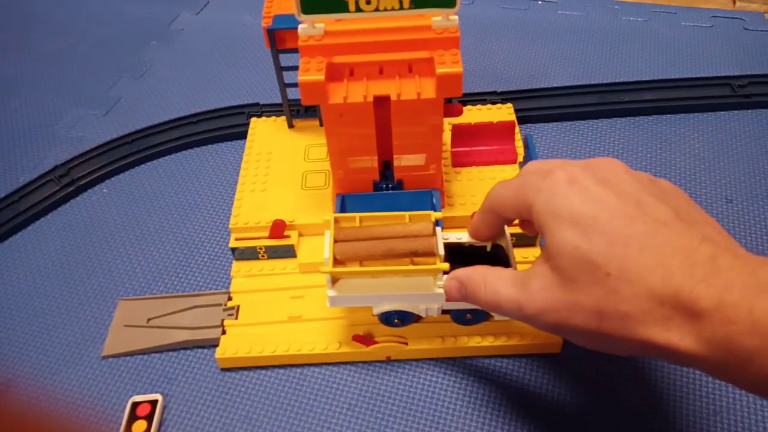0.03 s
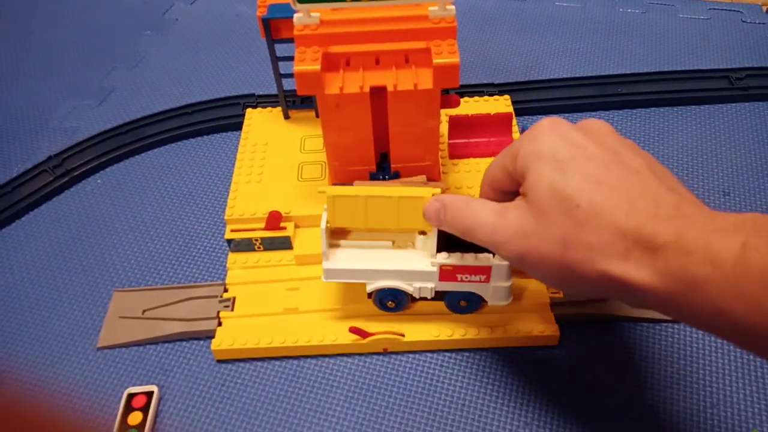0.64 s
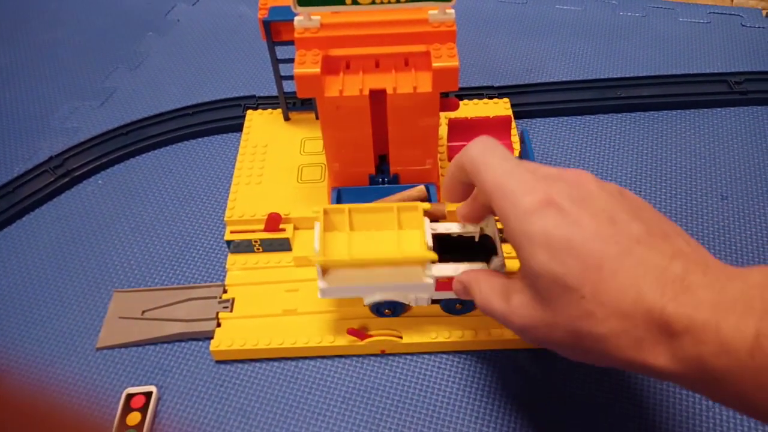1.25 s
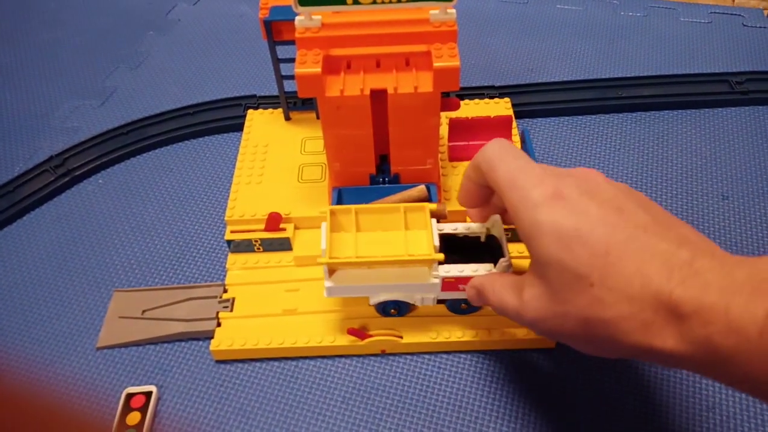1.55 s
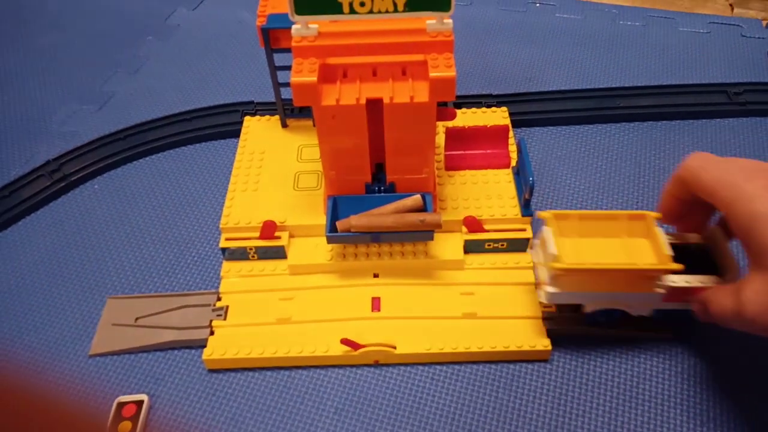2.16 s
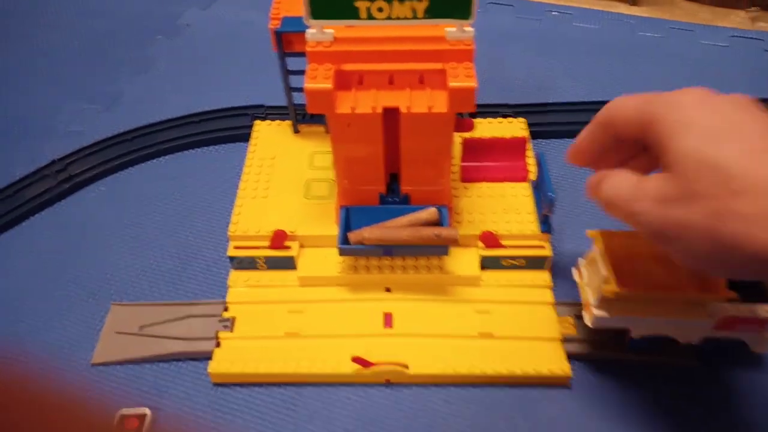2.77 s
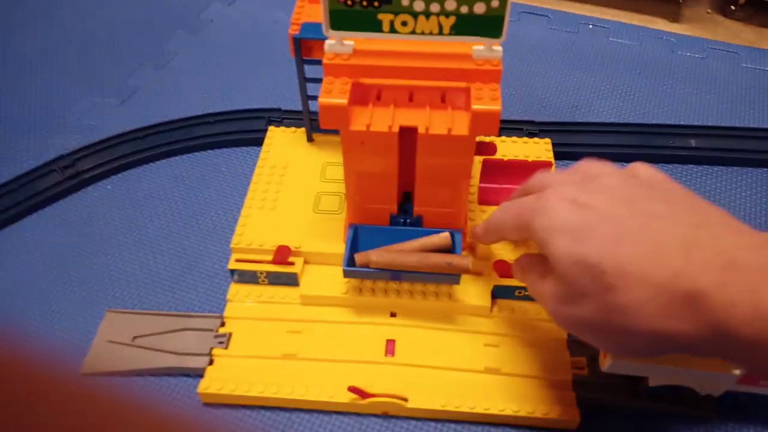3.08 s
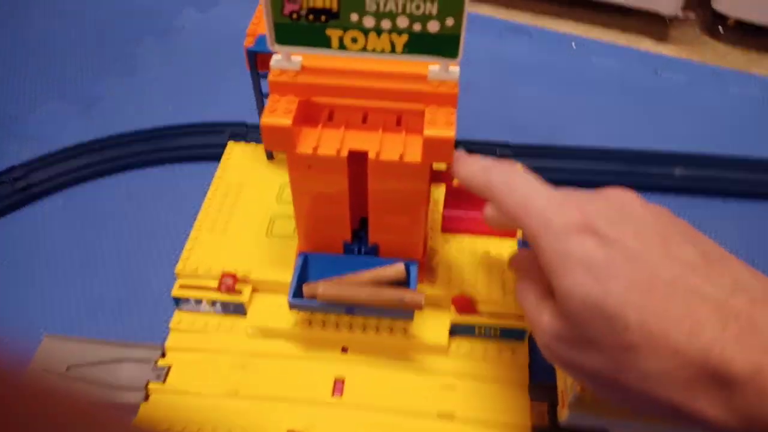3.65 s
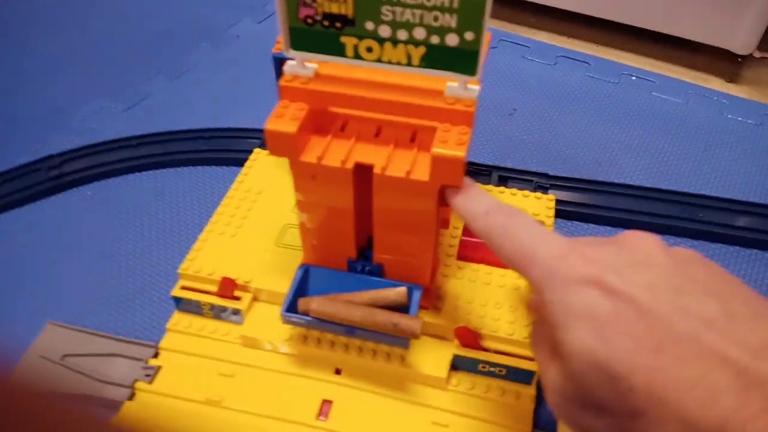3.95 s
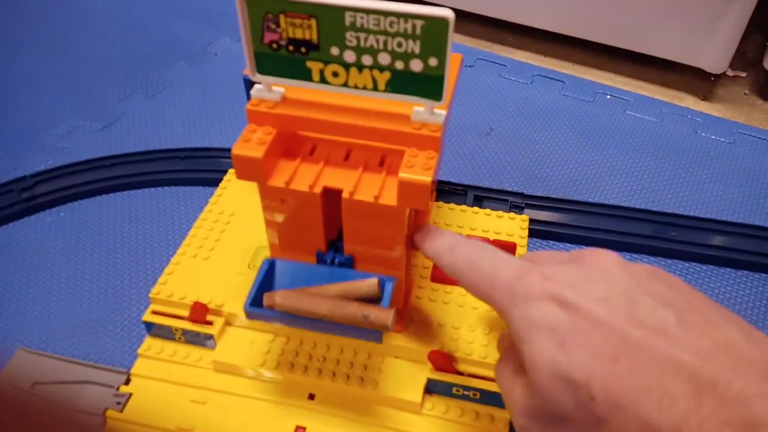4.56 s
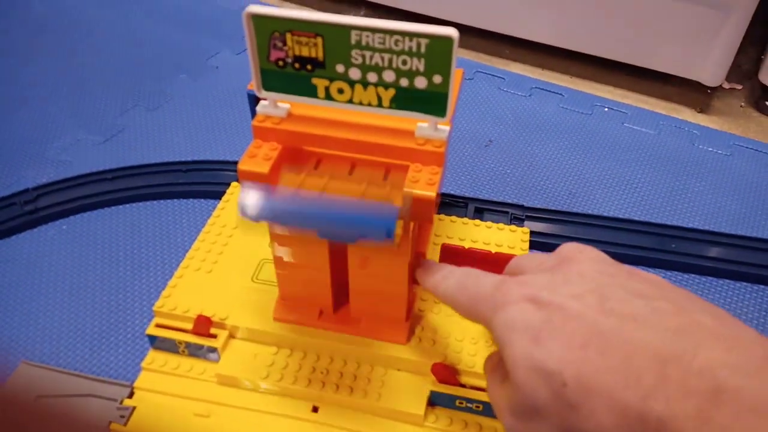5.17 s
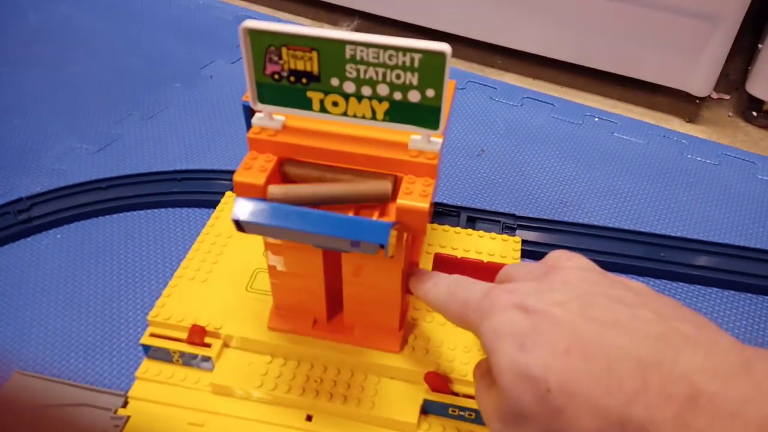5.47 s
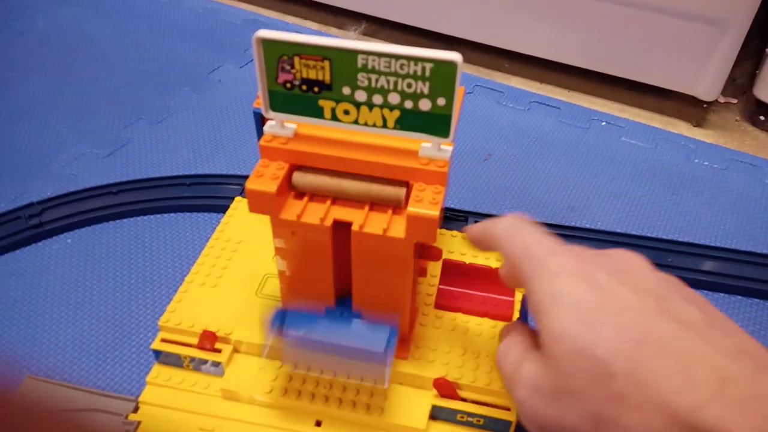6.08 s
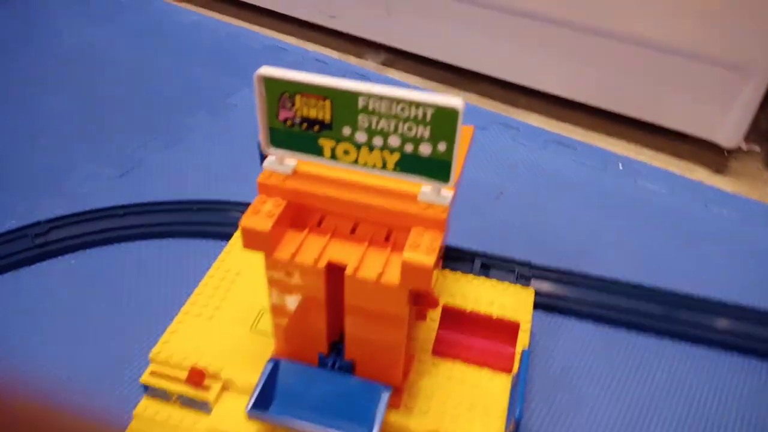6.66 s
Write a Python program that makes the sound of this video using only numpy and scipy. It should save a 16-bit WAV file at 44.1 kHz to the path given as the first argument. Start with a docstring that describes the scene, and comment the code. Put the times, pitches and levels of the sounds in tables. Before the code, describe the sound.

Plastic toy logs are tipped, lifted and rolled with sharp hollow clacks, over the faint whirr of a battery toy motor.

```python
"""A battery toy motor whirrs and ticks as it travels about: its gears hiss, catch and shake the casing.
In front of it, a little truck tips plastic logs into a tray; a hand-worked lift hoists them and they
tumble and roll down its tower. Each knock is a short crack that rings the hollow plastic playset;
each slide is a stream of tiny collisions. The room is small; the hand on the camera bumps softly."""
import sys
import numpy as np
from scipy import signal
from scipy.fft import rfft, irfft, next_fast_len
from scipy.io import wavfile
from scipy.ndimage import uniform_filter1d, map_coordinates

SR = 44100
rng = np.random.default_rng(int(sys.argv[2]) if len(sys.argv) > 2 else 0)


def wav_out(sig):
    """Save sig, one row per channel (or a flat mono array), as 16-bit PCM at SR to the path in sys.argv[1]."""
    wavfile.write(sys.argv[1], SR, np.round(np.clip(np.atleast_2d(sig).T, -1, 1) * 32767).astype(np.int16))


N = 300762
TIME = np.arange(N) / SR

# motor on its travels (time [s], hiss [dB], casing [dB], ticks re hiss [dB], hiss treble [dB])
MOTOR_LEVELS = [(0, -51, -60.5, -0.5, -0.5), (.4, -50.5, -56.5, 1.5, 2), (1.1, -48, -54, -6, -3),
                (1.6, -51, -56.5, -11, 1.5), (2, -53, -58.5, -4, 4), (2.7, -55.5, -59, 9, 5.5),
                (3.3, -52, -60.5, -5, 1), (3.8, -51.5, -62, -10.5, -3), (4.7, -53.5, -64, -6.5, -1),
                (6.82, -52.5, -59.5, 0.5, -2.5)]
# gear hiss (frequency [Hz], level [dB])
HISS_SPECTRUM = [(4000, -28.5), (5000, -2), (5500, 4.5), (6100, 6), (7000, 3), (7600, -5.5), (8200, -17.5),
                 (9400, -20.5), (11000, -28), (13300, -36.5), (15200, -17.5), (16000, -30.5)]
# casing resonances before the bend (frequency [Hz], width [Hz], level [dB])
CASING_MODES = [(1390, 270, -10.5), (2010, 80, -4.5), (2440, 530, 1), (2904, 200, 1.5), (3340, 450, 2.5),
                (3620, 160, -3), (4130, 610, 3)]
# resonances sink as the toy moves off, climb as it comes round (time [s], pitch [ratio])
TRAVEL_BEND = [(0, 0.99), (.5, 1.015), (1.2, 1.064), (2.3, 0.93), (3.0, 1.03), (3.6, 1.015), (4.3, 0.96),
               (6.82, 0.92)]
# gear catch on five successive turns (level [dB])
CATCH_PATTERN_DB = [5, 1.5, -5, 4, -21]
# hardest gear catches (time [s], relative level [dB])
GEAR_SNAGS = [(.053, -46), (.117, -41), (.158, -45), (.266, -41), (.33, -42), (.393, -43), (.435, -32),
              (.893, -45), (.957, -37), (.998, -37), (1.063, -42), (4.015, -43)]
# casing and creaking plastic (middle [s], length [s], frequency [Hz], level [dB], glide [% per length])
NARROW_RINGS = [(0.072, 0.26, 1630, -66.5, -3), (0.136, 0.18, 4250, -62.5, 0),
                (0.104, 0.22, 5190, -61.5, -1), (0.298, 0.4, 2805, -63.5, -2),
                (0.326, 0.12, 3650, -62.5, -5), (.43, 0.17, 1570, -65, -3.5), (0.46, 0.12, 5060, -61, -4),
                (0.507, 0.13, 3460, -53, -3), (0.798, 0.21, 3366, -54.5, 0.5), (0.853, 0.18, 4230, -59, 2),
                (0.942, 0.15, 3510, -57, -1), (1.087, 0.27, 3360, -59, 0), (1.5, .26, 3420, -61.5, -2),
                (1.581, 0.22, 1904, -64.5, 0), (1.923, 0.11, 1186, -54, -4), (2.251, 0.39, 1905, -66.5, -1),
                (2.242, 0.17, 3640, -62, 1.5), (2.58, 0.24, 3685, -66, 0), (3.267, .5, 2890, -62.5, 2.5),
                (3.325, 0.25, 4200, -64.5, 3), (3.352, 0.5, 1982, -66.5, 2.5),
                (3.953, 0.24, 2980, -73, -1.5), (4.655, 0.093, 1360, -64, -13), (6.755, 0.07, 2843, -52, 0),
                (6.766, 0.074, 4250, -59, -3)]
# still room (frequency [Hz], level [dB])
AIR_SPECTRUM = [(20, -29), (45, -6), (90, 0.5), (220, -6.5), (400, -7.5), (1000, -9), (3000, -17.5),
                (8000, -53)]
# blows: logs tip 0.5 s, lift climbs 4.3 s, tumble 5.3 s, lift drops 6.0 s, logs roll down 6.3 s
# (time [s], part, level [dB], hardness tilt [dB/octave], piece ring [Hz])
BLOWS = [ (.498, "log", -44.5, 0, 2190), (0.548, "log", -37, -4, 2940), (0.6008, "truck", -39, 1, 2720),
         (.616, "log", -34, 1, 4580), (.633, "log", -36.5, -3.5, 2140), (0.645, "log", -39, 5, 4420),
         (.665, "catch", -35.5, -3, 4610), (.677, "log", -36, 4.5, 2640), (.684, "log", -34, 1, 2000),
         (0.7003, "log", -43.5, 4, 2870), (.787, "log", -41, 0, 4770), (1.113, "log", -44.5, -1, 1910),
         (1.1747, "truck", -35.5, 3, 5550), (1.227, "truck", -38.5, -1, 2920),
         (1.233, "truck", -43.5, -1, 2370), (1.347, "tower", -41.5, -3, 1690),
         (1.3519, "lift", -30.5, 2, 1130), (1.36, "log", -37.5, 6, 2300), (1.3705, "truck", -42, 3, 3400),
         (1.38, "log", -46, 2, 3440), (1.418, "log", -38.5, -1.5, 2236), (1.444, "log", -45.5, 0, 2250),
         (1.647, "log", -54, 2, 2005), (1.693, "base", -53.5, 2.5, 1126), (1.843, "log", -55.5, -2.5, 1936),
         (1.879, "log", -51.5, 5, 2100), (1.962, "lift", -61.5, -4, 1200),
         (1.974, "lift", -58.5, -1.5, 1500), (2.139, "truck", -55, -0.5, 3020),
         (2.209, "log", -55.5, 1, 1955), (2.232, "log", -57, 1, 1920), (2.403, "log", -58, -0.5, 3230),
         (2.812, "log", -61, 6, 1897), (3.233, "tower", -57.5, 5.5, 5250), (3.704, "log", -59, 1, 2430),
         (4.297, "base", -54.5, 1.5, 1296), (4.323, "log", -52, -1, 2630), (4.432, "lever", -65, -0.5, 370),
         (4.453, "log", -59, 1, 1730), (4.546, "base", -57.5, 0.5, 1084), (4.618, "log", -55.5, -1.5, 1440),
         (4.812, "base", -62.5, 4, 1150), (4.833, "lift", -57, -3.5, 1290), (4.912, "lever", -42, -1, 400),
         (4.99, "lever", -63.5, -0.5, 2260), (5.057, "lever", -53.5, 0, 2305),
         (5.1604, "lift", -39, 0, 2400), (5.172, "lift", -46.5, 0, 2530), (5.182, "lift", -45.5, 0, 1450),
         (5.24, "base", -57, -0.5, 1080), (5.27, "tower", -47, 2, 1100),
         (5.275, "end stop", -33, -0.5, 1090), (5.3496, "tower", -40, -2, 4580),
         (5.358, "truck", -32.5, -0.5, 1715), (5.362, "log", -38.5, -6, 1780),
         (5.3838, "tower", -34, -1, 4680), (5.387, "tower", -43.5, -4, 2600),
         (5.3972, "tower", -34, 0, 4120), (5.409, "tower", -35.5, 1, 4770), (5.414, "tower", -41, -3, 6950),
         (5.423, "tower", -53, -5.5, 3600), (5.438, "catch", -45.5, 0.5, 6700),
         (5.448, "tower", -40.5, 4, 4000), (5.466, "tower", -32.5, 1.5, 6000),
         (5.491, "ledge", -35, 0, 1038), (5.512, "ledge", -40.5, 0, 1056), (5.526, "base", -53, 2, 1086),
         (5.541, "catch", -57, -5, 4770), (5.554, "tower", -46.5, -3.5, 4650),
         (5.5583, "lift", -30.5, -0.5, 1050), (5.6025, "lift", -37.5, -1.5, 4130),
         (5.623, "log", -40.5, -1.5, 4180), (5.628, "end stop", -44, -4, 1110),
         (5.647, "base", -48, 0, 1060), (5.781, "log", -51, 9.5, 2480), (6.042, "base", -49, 7, 1254),
         (6.073, "tower", -49.5, 0.5, 6840), (6.0781, "end stop", -41, 2, 5170),
         (6.101, "ledge", -48.5, 3, 1125), (6.107, "ledge", -47.5, 4, 1140),
         (6.132, "catch", -37, -1.5, 4750), (6.14, "tower", -51, 6, 5640),
         (6.183, "catch", -33.5, -3.5, 6500), (6.1994, "catch", -46.5, -6, 6100),
         (6.206, "catch", -34.5, -0.5, 6120), (6.345, "log", -44, -6, 2220), (6.39, "log", -46, -4.5, 2540),
         (6.407, "log", -41.5, -3.5, 2230), (6.469, "log", -50, 0.5, 2380), (6.537, "chute", -48, 1, 4370),
         (6.5415, "chute", -40.5, -1, 5300), (6.544, "chute", -35.5, 1, 5880),
         (6.573, "chute", -51, 3.5, 6120), (6.58, "chute", -39, 3, 3910), (6.591, "chute", -45, -3, 3900),
         (6.615, "log", -41.5, 1, 1500), (6.632, "log", -51, 0, 2320), (6.643, "base", -52.5, 2, 1163),
         (6.66, "log", -50, 0, 4310)]
# limits of the thud, body, clack, click and snap bands (frequency [Hz])
BLOW_EDGES_HZ = [170, 700, 1400, 3500, 8000, 16500]
# part -> (thud [dB], body [dB], clack [dB], click [dB], snap [dB], piece ring [dB],
# crack t60 [s], ring t60 [s]); both t60s are clamped in use
PART_COLOURS = {"log": (-29, -13.5, 0.5, -2, -27.5, -11, 0.0306, 0.25),
                "truck": (-24.5, -15.5, 3.5, 1, -33, -9.5, 0.0143, .015),
                "base": (-14, 5.5, -1, -12, -32, 3, 0.05, -0.1),
                "lever": (-2.5, -8.5, 2, -8, -16, -9, 0, .035),
                "lift": (-14.5, -6, -0.5, -9, -15.5, -8, 0.0191, -0.1),
                "end stop": (-15, 0.5, -1, 6, 1, -11.5, 0.03, -0.1),
                "ledge": (-13.5, 1.5, -7.5, 3, -14, -9, -0.01, .04),
                "tower": (-17.5, -6.5, -0.5, 2.5, -13.5, -5, -0.01, 0.6),
                "catch": (-19.5, -14, 1, 8.5, 2.5, -3.5, -0.0066, 0.8),
                "chute": (-28, -18, 1.5, 9.5, -16, -9, 0, .035)}
# plastic-on-plastic crack (frequency [Hz], level [dB])
CRACK_SPECTRUM = [(120, -26), (260, -23.5), (370, -1), (520, -8.5), (720, -21.5), (1100, -1), (1400, -6),
                  (2000, 4), (3700, -1), (4600, 10), (6900, 7.5), (8200, -15.5), (10500, -22), (13000, -27),
                  (15200, -14.5), (16500, -34)]
# hollow playset (frequency [Hz], level [dB], t60 before the cycle cap [s])
SHELL_MODES = [(359, 2, 0.12), (429.5, -10, 0.11), (510.6, -2.5, 0.095), (608, -10, 0.088),
               (856, -3.5, 0.063), (1014, -3, 0.14), (1100, 6, 0.081), (1306, -9, 0.18), (1515, 4, 0.042),
               (1703, -2, 0.087), (2060, -11, 0.04), (2510, 8, 0.053), (2652, 10.5, 0.036),
               (3465, 5, 0.087), (4210, 5, 0.046), (4700, -1, 0.06), (5190, 13.5, 0.032)]
# room tail (band centre [Hz], t60 [s], level [dB])
REVERB_BANDS = [(264, 0.28, -7.5), (800, 0.17, -9.5), (2080, 0.24, -8), (5670, 0.26, -11),
                (13800, 0.14, -12.5)]
# wheels, lift and logs moving (start [s], length [s], level [dB], brightness [dB], hollowness [dB])
SLIDES = [(0.584, 0.13, -48.5, 6.5, 6), (0.8, 0.03, -55, -10, 2), (1.192, 0.083, -56.5, 8.5, -6),
          (1.336, 0.063, -46.5, -2, -6), (1.937, 0.041, -54.5, -24, 5), (2.787, 0.02, -73, 18.5, -2),
          (3.472, 0.022, -67, 11.5, -9), (4.152, 0.084, -66.5, 2, -12), (4.302, 0.054, -57, 1.5, 5),
          (4.59, 0.19, -67, -11, -15), (4.755, 0.24, -64, -10, 0), (5.089, 0.031, -48, 0, -26),
          (5.163, 0.18, -54.5, 0.5, -5), (5.364, 0.17, -46.5, -5, 6), (5.518, 0.18, -47.5, -14, -1),
          (5.775, 0.029, -51, 9.5, -27), (6.08, 0.26, -48, -7.5, 6), (6.335, 0.11, -45, 0, 0),
          (6.449, 0.21, -44.5, -0.5, 1.5)]
# sliding plastic (frequency [Hz], level [dB])
SLIDE_SPECTRUM = [(150, -33), (270, -32), (350, -3), (430, -13.5), (520, 2), (720, -5.5), (1100, 6),
                  (1450, -0.5), (2400, 2.5), (4200, -10.5), (6500, -3.5), (8300, -57), (16000, -64)]
# hand shifting (time [s], level [dB], length [s])
HAND_BUMPS = [(0.933, -77, 0.1), (1.524, -74, 0.026), (2.814, -67, 0.033), (2.932, -80, 0.24),
              (3.793, -70.5, 0.075), (5.161, -66, 0.039), (6.192, -74, 0.019)]

TOP_HZ, MAX_RING_CYCLES = 16400, 125


def undb(db):
    """Decibels to gain."""
    return 10 ** (np.asarray(db) / 20)


def unit(x):
    """Scale to rms 1."""
    return x / np.sqrt(np.mean(x ** 2) + 1e-20)


def fade(t, t60_s):
    """Free decay, 60 dB in t60_s (1 ms at least)."""
    return np.exp(-np.log(1000) * t / max(t60_s, 1e-3))


def curves(table):
    """Table columns, interpolated over time."""
    times_s, *columns = np.transpose(table)
    return [np.interp(TIME, times_s, column) for column in columns]


def colour(x, points):
    """Shape a spectrum by (Hz, dB) points."""
    hz, db = np.transpose(points)
    size = next_fast_len(len(x))
    bins_hz = np.maximum(np.arange(size // 2 + 1) * SR / size, 1)
    gain = undb(np.interp(np.log(bins_hz), np.log(hz), db))
    return irfft(rfft(x, size) * gain, size)[:len(x)]


def band(x, lo_hz, hi_hz, order=3):
    """Causal band-pass."""
    return signal.sosfilt(signal.butter(order, [lo_hz, hi_hz], "band", fs=SR, output="sos"), x)


def lowpass(x, hz, order):
    """Zero-phase low-pass."""
    return signal.sosfiltfilt(signal.butter(order, hz, fs=SR, output="sos"), x)


def resonate(x, hz, width_hz):
    """One resonance, unity gain at centre."""
    return signal.lfilter(*signal.iirpeak(hz, hz / width_hz, fs=SR), x)


def walk(rate_hz):
    """Smooth random drift, rms 1."""
    hold = int(SR / rate_hz)
    steps = np.repeat(rng.standard_normal(N // hold + 1), hold)
    return unit(uniform_filter1d(steps, hold)[:N])


def grains(rate_hz, spread_db):
    """Random tiny impacts of uneven size."""
    impulses = (rng.random(N) < rate_hz / SR) * rng.choice([-1, 1], N)
    return impulses * undb(spread_db * np.clip(rng.standard_normal(N), -2, 2))


def reflections(x, floor_s=0.001046, wall_s=0.0034, drift_s=0.00002, gain=0.27):
    """Echo paths change as the toy travels: peaks and notches sweep the whirr."""
    bend, = curves(TRAVEL_BEND)
    lags_s = [lag_s / bend + drift_s * walk(1.52) for lag_s in (floor_s, wall_s)]
    return x + gain * sum(map_coordinates(x, [(TIME - lag_s) * SR], mode="mirror") for lag_s in lags_s)


def standing_waves(x, strip_hz=220, swell_s=0.16, depth_db=1.7, size=1024):
    """The toy crosses standing waves: narrow strips of hiss swell and sink."""
    spectrum = signal.stft(x, nperseg=size)[2]
    field = rng.standard_normal(spectrum.shape)
    for _ in range(2):
        field = uniform_filter1d(field, int(strip_hz * size / SR), axis=0)
        field = uniform_filter1d(field, int(swell_s * 2 * SR / size), axis=1)
    return signal.istft(spectrum * undb(depth_db * unit(field)), nperseg=size)[1][:N]


def turning(x, treble_db, drift_db=0.4, drift_hz=3):
    """The toy turns: treble comes and goes, each band drifting on its own."""
    out = 0
    for hz in (8000, 7000, 6200):
        lower = lowpass(x, hz, order=6)
        out = out + (x - lower) * undb(treble_db + drift_db * walk(drift_hz))
        x = lower
    return out + x * undb(drift_db * walk(drift_hz))


def motor(grit_hz=900, grit_db=-4, hiss_trim_db=-2.5, casing_trim_db=-4):
    """Meshing teeth hiss, tick and shake the casing."""
    hiss_db, casing_db, catch_db, treble_db = curves(MOTOR_LEVELS)
    ticks = gear_ticks(catch_db, hiss_db)
    teeth = rng.standard_normal(N) + undb(grit_db) * unit(grains(grit_hz, spread_db=4))
    flutter_db = 1.7 * walk(60) + 0.5 * walk(8.4)
    teeth *= undb(flutter_db)
    hiss = colour(reflections(teeth), HISS_SPECTRUM)
    hiss = turning(unit(standing_waves(hiss)), treble_db)
    gears = (hiss + ticks) * undb(hiss_db + hiss_trim_db)
    return gears + casing(teeth) * undb(casing_db + casing_trim_db)


def casing(teeth, waver_db=2):
    """Tooth-driven resonances waver in level and glide as the toy travels."""
    modes = sum(undb(db + waver_db * walk(5.5)) * resonate(teeth, hz, width_hz)
                for hz, width_hz, db in CASING_MODES)
    bend, = curves(TRAVEL_BEND)
    gliding = map_coordinates(unit(modes), [np.cumsum(bend)], mode="mirror")
    return band(gliding, 1010, 5400, order=4)


def gear_ticks(catch_db, hiss_db, turn_hz=46.6, sync_s=0.06, scatter_db=4, decay_turns=0.17):
    """Gears catch once a turn in a loose pattern; output is relative to the hiss level."""
    backlash = 0.1 * walk(40)
    turns = np.cumsum(turn_hz * (1 + 0.004 * walk(1.4))) / SR - turn_hz * sync_s + backlash
    turn = np.floor(turns).astype(int)
    scatter = np.clip(rng.standard_normal(N // 100), -2, 1)[turn]
    tick_db = catch_db + np.take(CATCH_PATTERN_DB, turn, mode="wrap") + scatter_db * scatter
    ticks = undb(tick_db) * np.exp(-(turns % 1) / decay_turns) * rng.standard_normal(N)
    ticks += snags() / undb(hiss_db)
    return 2 * (undb(1) * band(ticks, 5550, 6800) + undb(-6) * band(ticks, 7000, 8930))


def snags(t60_s=0.018, trim_db=-3):
    """A tooth snags harder: a short, dry burst."""
    t = np.arange(SR // 25) / SR
    out = np.zeros(N)
    for time_s, db in GEAR_SNAGS:
        start = int(time_s * SR)
        out[start:start + len(t)] += undb(db + trim_db) * fade(t, t60_s) * rng.standard_normal(len(t))
    return out


def singing(core_hz=36, rasp_hz=110, rasp_gain=0.55, waver_hz=14, waver_share=0.00502):
    """Gear noise briefly sustains rasping rings; each wavers and glides."""
    filters = [signal.butter(2, hz, fs=SR, output="sos") for hz in (core_hz, rasp_hz, waver_hz)]
    out = np.zeros(N)
    for middle_s, length_s, hz, db, glide_percent in NARROW_RINGS + fleeting_rings():
        near = np.abs(TIME - middle_s) < length_s
        place = (TIME[near] - middle_s) / length_s
        core, rasp, waver = (unit(signal.sosfilt(sos, rng.standard_normal(SR)))[-len(place):]
                             for sos in filters)
        pitch_hz = hz * (1 + glide_percent / 100 * place + waver_share * waver)
        ring = (core + rasp_gain * rasp) * np.sin(2 * np.pi * np.cumsum(pitch_hz) / SR)
        out[near] += unit(ring) * undb(db) * np.exp(-(2 * place) ** 2)
    return out


def fleeting_rings(count=50, lo_hz=1500, hi_hz=4700, re_casing_db=-10, length_s=0.13, glide_percent=3):
    """Rows of fainter chance rings that follow the casing's level."""
    casing_db = curves(MOTOR_LEVELS)[1]
    return [(when * N / SR, length_s * (0.5 + span), lo_hz * (hi_hz / lo_hz) ** pitch,
             casing_db[int(when * N)] + re_casing_db, glide_percent * (2 * slope - 1))
            for when, span, pitch, slope in rng.random((count, 4))]


def room_tone(level_db=-83.5):
    """Still room: faint, dark noise."""
    return unit(colour(rng.standard_normal(N), AIR_SPECTRUM)) * undb(level_db)


def contact(crack_t60_s, graze_db=-16, graze_share=0.07, bounce_db=-9, bounce_share=0.1):
    """A corner grazes, the piece lands, then chatters twice. Returns impulses and landing sample."""
    push = np.zeros(SR // 25)
    landing = SR // 100
    lead, *lags = crack_t60_s * SR * rng.uniform(0.5, 1.5, 3)
    push[landing] = 1
    push[landing - int(np.clip(graze_share * lead, 1, landing))] += undb(graze_db)
    for k, lag in enumerate(np.cumsum(lags) * bounce_share, 1):
        push[min(landing + int(lag), len(push) - 1)] += undb(bounce_db) / k
    return push / np.linalg.norm(push), landing


def crack(t, t60_s, ripple_db=7.5, wash_db=-23, wash_t60_s=0.16):
    """Dense, quickly damped modes: a noise burst and a faint wash."""
    grid_hz = np.arange(300, 16500, 300)
    grid_db = ripple_db * np.minimum(rng.standard_normal(len(grid_hz)), 0.5)
    noise = colour(rng.standard_normal(len(t)), CRACK_SPECTRUM)
    noise = colour(noise, np.column_stack([grid_hz, grid_db]))
    return noise * (fade(t, t60_s) + undb(wash_db) * fade(t, wash_t60_s))


def plastic_decay(t, hz, t60_s):
    """Plastic is lossy: t60 is capped at MAX_RING_CYCLES."""
    return fade(t, min(t60_s, MAX_RING_CYCLES / hz))


def shell_ring(t, spot_db=3, hollow_db=2.5, detune=0.02):
    """The hollow playset rings; each struck spot favours other modes."""
    out = 0
    for hz, db, t60_s in SHELL_MODES:
        strength, polarity, offset = rng.standard_normal(3)
        gain = undb(db + spot_db * strength + hollow_db * (hz < BLOW_EDGES_HZ[1])) * np.sign(polarity)
        out += gain * np.sin(2 * np.pi * hz * (1 + detune * offset) * t) * plastic_decay(t, hz, t60_s)
    return out


def knock(bands_db, ring_hz, ring_db, crack_t60_s, ring_t60_s, shell_db=-14, firm_db=-40):
    """One blow: crack, shell and struck piece, levelled per band over the first 8 ms."""
    t = np.arange(SR // 5) / SR
    attack = slice(0, SR // 125)
    piece = np.sin(2 * np.pi * ring_hz * t) * plastic_decay(t, ring_hz, ring_t60_s)
    layers = (0, crack(t, crack_t60_s)), (shell_db, shell_ring(t)), (ring_db, piece)
    blow = sum(undb(db) * x / np.std(x[attack]) for db, x in layers)
    # long or gentle contacts build more slowly
    gentleness = np.clip(undb(firm_db - max(bands_db)), 1, 3)
    rise_s = 0.027 * crack_t60_s * gentleness
    blow *= 1 - np.exp(-t / rise_s)
    bands = [band(blow, lo, hi, order=4) for lo, hi in zip(BLOW_EDGES_HZ, BLOW_EDGES_HZ[1:])]
    return sum(undb(db) * x / np.std(x[attack]) for db, x in zip(bands_db, bands))


def knocks(min_crack_t60_s=0.011):
    """All blows: the part sets the colour, harder contact tilts it to the treble."""
    out = np.zeros(N + SR)
    edges_oct = np.log2(BLOW_EDGES_HZ)
    centres_oct = (edges_oct[:-1] + edges_oct[1:]) / 2
    centres_oct -= np.median(centres_oct)
    for time_s, part, db, tilt_db, ring_hz in BLOWS:
        *colour_db, ring_db, crack_t60_s, ring_t60_s = PART_COLOURS[part]
        crack_t60_s = max(crack_t60_s, min_crack_t60_s)
        bands_db = db + np.array(colour_db) + tilt_db * centres_oct
        push, landing = contact(crack_t60_s)
        blow = signal.fftconvolve(knock(bands_db, ring_hz, ring_db, crack_t60_s, ring_t60_s), push)
        start = int(time_s * SR) - landing
        out[start:start + len(blow)] += blow
    return out[:N]


def room(x, gap_s=0.0019):
    """Small furnished room: a diffuse tail, top band dying first."""
    t = np.arange(SR // 2) / SR
    centres_hz = np.array([row[0] for row in REVERB_BANDS])
    edges_hz = [100, *np.sqrt(centres_hz[1:] * centres_hz[:-1]), TOP_HZ]
    tail = 0
    for (_, t60_s, db), lo, hi in zip(REVERB_BANDS, edges_hz, edges_hz[1:]):
        decay = fade(t, t60_s) * (t > gap_s)
        tail += undb(db) * band(rng.standard_normal(len(t)) * decay, lo, hi) / np.linalg.norm(decay)
    return x + signal.fftconvolve(x, tail)[:N]


def stroke(start_s, length_s, attack_s=0.012, release_t60_s=0.096):
    """A slide builds, holds while the piece moves, then dies."""
    age_s = TIME - start_s
    return np.clip(age_s / attack_s, 0, 1) * fade(np.maximum(age_s - length_s, 0), release_t60_s)


def rubbing(taps_hz=900, shell_db=-7, tap_t60_s=0.013, trim_db=-1, fingers_db=-77, swing_db=3):
    """Sliding and rolling: tiny collisions ring the shell; fingers brush it faintly throughout."""
    t = np.arange(SR // 4) / SR
    tap = rng.standard_normal(len(t)) * fade(t, tap_t60_s)
    shell = sum(undb(db) * np.cos(2 * np.pi * hz * t) * plastic_decay(t, hz, t60_s)
                for hz, db, t60_s in SHELL_MODES)
    taps = grains(taps_hz, spread_db=3.5)
    scrape = unit(colour(signal.fftconvolve(taps, tap)[:N], SLIDE_SPECTRUM))
    ring = unit(band(signal.fftconvolve(taps, shell)[:N], 380, 7200))
    rub = scrape + undb(shell_db) * ring
    dull = lowpass(rub, 1800, order=2)
    hollow = lowpass(dull, 560, order=3)
    out = rub * undb(fingers_db + swing_db * walk(14))
    for start_s, length_s, db, bright_db, hollow_db in SLIDES:
        slide = undb(hollow_db) * hollow + (dull - hollow) + undb(bright_db) * (rub - dull)
        out += stroke(start_s, length_s) * undb(db + trim_db) * slide
    return out


def handling():
    """Soft low hand bumps through the camera body."""
    swell = 0
    for time_s, db, length_s in HAND_BUMPS:
        age = np.maximum(TIME - time_s, 0) / (length_s / 2)
        swell += undb(db) * age * np.exp(1 - age)
    return swell * unit(band(rng.standard_normal(N), 57, 114, order=2))


def scene():
    """Playset close by, motor further off, faint room tone; mono."""
    air = room_tone()
    playset = room(knocks() + rubbing())
    return (playset + motor() + singing() + handling() + air)[None]


def record(dry):
    """Steep low-pass at TOP_HZ."""
    return signal.sosfilt(signal.ellip(8, 0.2, 70, TOP_HZ, fs=SR, output="sos"), dry)


dry = scene()
out = record(dry)
wav_out(out)
```